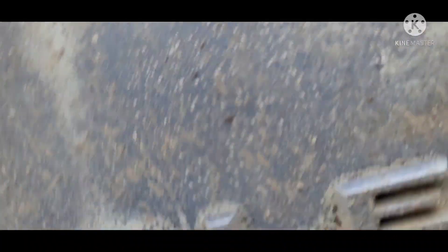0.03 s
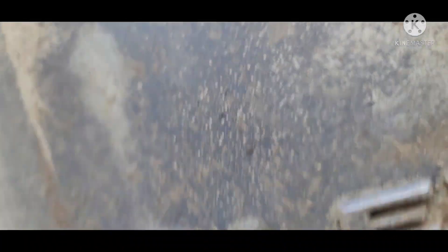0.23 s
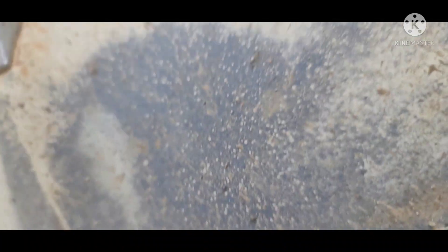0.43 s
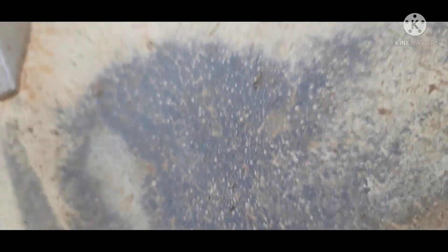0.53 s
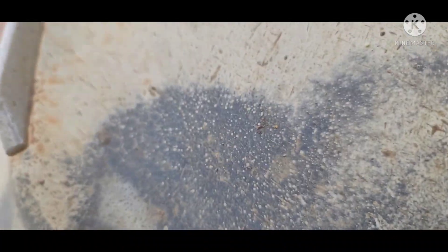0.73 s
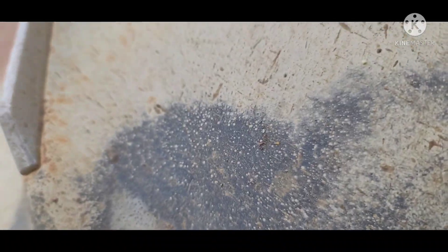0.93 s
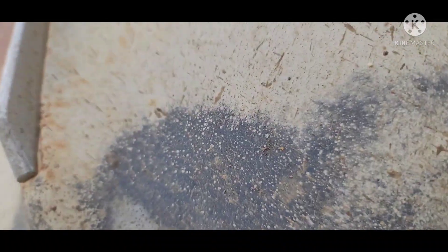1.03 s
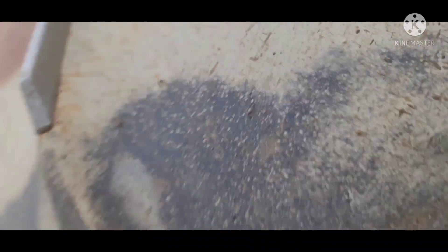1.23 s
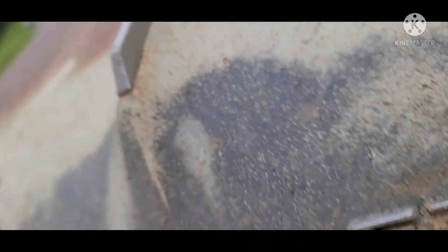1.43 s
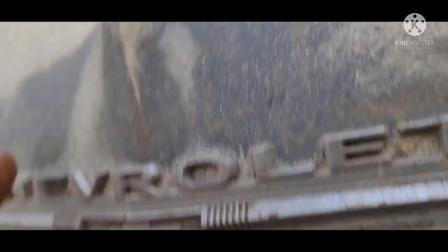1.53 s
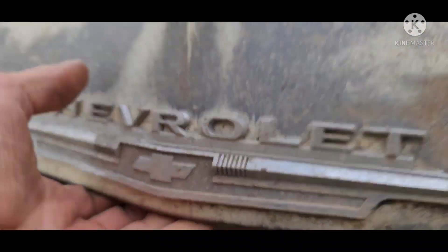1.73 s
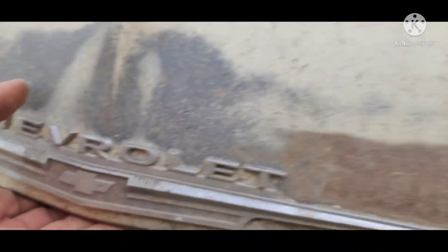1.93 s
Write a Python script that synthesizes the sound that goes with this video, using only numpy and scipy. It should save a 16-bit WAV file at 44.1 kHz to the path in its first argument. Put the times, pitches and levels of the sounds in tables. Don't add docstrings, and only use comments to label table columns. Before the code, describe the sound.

An old car hood pops open, heard close in stereo outdoors. From 0.1 to 0.25 s the latch squeals near 940 Hz amid rapid knocks; the panel booms low and wobbles until about 0.5 s. One clank lands at 0.83 s. Soft scraping comes near 1.1 s, a small squeak at 1.2, then sharp clattering from 1.23 to 1.56 s, fading into faint ticks. Faint bird whistles, quiet air.

```python
import sys
import numpy as np
from scipy import signal
from scipy.fft import rfft, irfft
from scipy.io import wavfile
from scipy.ndimage import uniform_filter1d

SR = 44100
rng = np.random.default_rng(int(sys.argv[2]) if len(sys.argv) > 2 else 0)


def ratio(d):
    e = np.asarray(d, float) / 20
    return 10 ** e


def master_out(mix):
    frames = np.transpose(np.atleast_2d(mix))
    ceiling = np.clip(frames, -1, 1)
    pcm = np.round(ceiling * 32767).astype(np.int16)
    wavfile.write(sys.argv[1], SR, pcm)


N = 88200
TIME = np.arange(N) / SR

# start in seconds, bare-metal tick in dB, sheet clang in dB,
# chatter length in seconds, top treble of the tick in dB.
KNOCKS = [(.066, -80, -57, 0.011, -14), (.088, -73, -50, 0.0039, -12), (.140, -35.5, -43, 0.018, -8),
          (.160, -55, -28.5, 0.015, -12), (.197, -49, -34.5, 0.011, -6), (.2225, -27, -30.5, 0.005, 1),
          (.232, -35, -31, 0.0089, -10), (.253, -49, -42, 0.0015, 1), (.283, -52, -44, 0.0021, 4),
          (.3587, -39, -38, 0.0034, 2.5), (.376, -52, -40, 0.0022, 3), (.419, -60, -44.5, 0.0036, 8),
          (.432, -54.5, -63, 0.0024, 8.5), (.49, -72, -46.5, 0.003, -20), (.572, -64, -54, 0.0094, -7),
          (.835, -31, -24, 0.003, 0), (1.177, -61, -54, 0.011, 9), (1.232, -47, -42, 0.035, -2),
          (1.2645, -27.5, -32.5, 0.013, -14), (1.281, -50, -35.5, 0.0033, -17), (1.302, -37, -39, .009, 5),
          (1.3095, -24, -45, 0.0059, 11), (1.3122, -21, -47, 0.0018, -6), (1.3185, -26, -36, .005, -17),
          (1.3585, -30, -33.5, 0.0061, 7), (1.363, -47, -32, 0.0027, -4), (1.3915, -27.5, -28, 0.0032, 9),
          (1.397, -24.5, -34, 0.002, 4.5), (1.411, -47, -36, 0.0048, -12),
          (1.462, -32.5, -34.5, 0.0085, 0.5), (1.5262, -46.5, -60, 0.0059, 9),
          (1.5307, -38, -39.5, 0.0062, 3), (1.561, -34, -42, 0.0071, 3), (1.705, -50, -56, 0.0073, 4),
          (1.75, -59, -72, 0.01, 9), (1.786, -52.5, -48.5, 0.0061, 8.5)]
# frequency in Hz, density in dB per Hz.
TICK_SPECTRUM = [(1180, -9.5), (2000, 2.5), (2300, -0.5), (5580, -2.5), (7640, 3), (9250, -8.5),
                 (13600, -4), (15600, -3), (16000, 4)]
# frequency in Hz, width in Hz, level in dB.
LATCH_MODES = [(2515, 60, 3.5), (3086, 26, 13.5), (3550, 53, -18), (4400, 50, -2), (6400, 25, -10.5),
               (7380, 24, -2.5), (10820, 28, -7.5), (13700, 370, 10)]
# frequency in Hz, density in dB per Hz.
SHEET_SPECTRUM = [(150, -8.5), (400, -1.5), (700, -3.5), (1300, 1), (2000, -6), (3000, -6.5), (8000, -19),
                  (14000, -45)]
# frequency in Hz, time to fall 60 dB in seconds.
SHEET_DECAY = [(300, 0.39), (700, 0.52), (1500, 0.43), (3000, 0.22), (6000, 0.14), (12000, 0.13)]
# frequency in Hz, time to fall 60 dB in seconds,
# level in dB struck at the edge, level in dB struck at the catch.
SHEET_RINGS = [(119.4, 0.25, -13, -2), (136.2, 0.45, 8, -12), (307, 0.48, 0, -6), (509.5, 0.17, -18, -1),
               (639, 0.25, -30, 1.5), (726, 0.11, 14.5, -8.5), (836, 0.12, 11.5, 4.5),
               (1116, 0.18, 3, -4.5), (1267, 0.13, 15, -6), (1385, 0.054, 20, 3), (1884, 0.079, 12.5, 2),
               (1914, 0.11, 12.5, -17), (2170, 0.027, -1, -4.5), (2970, 0.083, 2.5, -24)]
# time in seconds, level in dB.
SHAKE = [(0, -44), (0.049, -63), (0.093, -37.5), (0.146, -40), (0.166, -15), (.27, -16), (.44, -23.5),
         (.545, -28), (.575, -30.5), (0.823, -42), (.84, -30.5), (1.2, -43.5), (1.34, -30), (1.383, -22.5),
         (1.448, -29), (1.628, -30.5), (1.67, -33.5), (2.0, -44)]
# frequency in Hz, width in Hz, level in dB.
HOOD_MODES = [(48.4, 18, -5), (77.9, 12.2, -1.5), (115.9, 10.5, 0.5), (152, 26, -7), (173.6, 7.3, -6),
              (210.8, 17.4, -4.5), (279.9, 13.3, -5), (380.6, 21.3, -6), (417, 6.5, -12.5),
              (477.6, 11, -12), (539, 19, -13.5), (724, 4.9, -12)]
# frequency in Hz, density in dB per Hz.
HOOD_WASH = [(15, -47), (25, -36.5), (113, -9), (188, -25), (582, -15.5), (636, -17.5), (5000, -54),
             (6500, -72), (11000, -120)]
# start in seconds, length in seconds, pitch in Hz, level in dB.
FLEXES = [(.16, 0.033, 72, -18), (.19, 0.035, 110.6, -16.5), (.222, 0.056, 107.4, -20.5),
          (.26, 0.035, 114, -19.5), (.305, 0.047, 111.5, -17), (.40, 0.06, 123.5, -22),
          (.49, 0.035, 122, -29.5), (.525, .035, 115.5, -29.5), (.158, 0.02, 523, -23),
          (.84, 0.069, 139.7, -31.5), (1.362, .04, 113, -22.5), (1.4, .04, 115, -41),
          (1.595, 0.035, 109, -31)]
# time in seconds, pitch in Hz, level in dB,
# sharpness of the slip in dB.
SQUEAL = [
    (0.089, 1003, -63, -8),
    (0.108, 961, -31.5, -8.5),
    (0.126, 984, -25, -7),
    (0.145, 940.5, -18, -1),
    (0.159, 941.4, -16.5, -8),
    (0.177, 939, -29.5, 0.5),
    (0.192, 902, -38, 3),
    (0.201, 927, -20, -14),
    (.215, 946, -29.5, -7),
    (0.238, 922, -52, -14),
]
SQUEAL_OVERTONES = [0, -5, -17, -20]
SQUEAL_LEFT_LEAD = [1.8, 2.4, 2.2, 2.2]
# start in seconds, length in seconds, pitch in Hz, level in dB.
SQUEAKS = [
    (.118, .04, 790, -36),
    (.08, .025, 1080, -50),
    (1.208, .048, 2020, -34),
    (1.397, .04, 1850, -31),
]
# start in seconds, length in seconds, level in dB, dullness in dB.
SCRAPES = [(0.071, 0.22, -63.5, -1), (0.127, 0.098, -47, 11), (0.246, 0.16, -59.5, 11),
           (0.537, 0.097, -68, -7), (0.691, 0.066, -59.5, -13), (1.073, 0.095, -48, 8),
           (1.088, 0.054, -39.5, 6), (1.12, 0.32, -62, 14), (1.416, 0.22, -51, 9.5),
           (1.603, 0.27, -59.5, 4), (1.936, 0.099, -64.5, -17)]
# frequency in Hz, density in dB per Hz.
SCRAPE_SPECTRUM = [(240, -80), (400, -21.5), (598, -4), (1820, -11.5), (3310, -11.5), (12900, -6),
                   (16000, -5.5)]
# frequency in Hz, width in Hz, level in dB.
BRACKET = [(3980, 210, 7.5), (7240, 2000, -3), (13400, 300, -5.5)]
# start in seconds, length in seconds, first pitch in Hz, last pitch in Hz,
# level in dB.
BIRD = [
    (0, .085, 2280, 2300, -67),
    (0.597, .07, 2300, 2316, -60),
    (0.77, .045, 4700, 3820, -74),
    (0.994, .07, 2300, 2270, -56.5),
]
# frequency in Hz, density in dB per Hz.
YARD = [(30, -26), (170, -5.5), (600, -32), (2000, -31.5), (9000, -44), (16000, -43)]
# frequency in Hz, likeness from 0 to 1.
LIKENESS = [(60, .9), (200, .9), (280, .65), (450, .3), (800, .55), (1500, .65), (2600, .25)]
# frequency in Hz, left minus right in dB.
LEFT_OVER_RIGHT = [(60, -1.5), (250, 0), (500, -6.5), (950, -2), (2000, -3), (6000, 2), (14000, -4.5)]
# frequency in Hz, lead of the left in radians.
LEFT_LEAD = [(250, 0), (420, -2.4), (650, -3.0), (1300, -3.7), (2000, -4.1), (5000, -7.5), (16000, -24.5)]

EDGE_KNOCK_S, SAME_KNOCK_S = 0.835, 0.007
RISE_S = 0.0015


def evened(x):
    return x / np.sqrt(np.mean(x ** 2, -1, keepdims=True) + 1e-20)


def read(points, hz):
    f, value = np.transpose(points)
    return np.interp(np.log(hz + 1), np.log(f + 1), value)


def colour(x, points):
    log_gain = read(points, abs(np.fft.fftfreq(8192, 1 / SR))) * np.log(10) / 20
    taps = np.fft.ifft(np.exp(np.conj(signal.hilbert(log_gain)))).real[:4096]
    taps = taps / np.linalg.norm(taps)
    return signal.oaconvolve(x, taps[None], axes=1)[:, :x.shape[1]]


def resonate(x, hz, width):
    r = np.exp(-np.pi * width / SR)
    return 2 * signal.lfilter([1 - r], [1, -r * np.exp(2j * np.pi * hz / SR)], x).real


def slow(width):
    return evened(uniform_filter1d(uniform_filter1d(rng.standard_normal(N), width), width))


def hump(start, length):
    return np.sin(np.pi * np.clip((TIME - start) / length, 0, 1)) ** 2


def clumpy(x):
    z = signal.stft(x, nperseg=256)[2]
    patches = uniform_filter1d(rng.standard_normal(z.shape[1:]), size=8, axis=0)
    patches = uniform_filter1d(patches, size=4, axis=1)
    return signal.istft(z * ratio(2.5 * patches / patches.std()), nperseg=256)[1][:, :N]


def sheet_response(place):
    length = SR // 2
    t = np.arange(length) / SR
    hz, frame_s, z = signal.stft(rng.standard_normal((2, length)), SR, nperseg=256)
    decay = ratio(-60 * frame_s / read(SHEET_DECAY, hz)[:, None])
    dense = colour(signal.istft(z * decay, SR, nperseg=256)[1][:, :length], SHEET_SPECTRUM)
    rings = 0
    for f, t60, *db in SHEET_RINGS:
        envelope = ratio(db[place] - 60 * t / t60) * np.minimum(t * f / 1.64, 1)
        pitch = f * (1 + place * 0.05 * rng.standard_normal())
        phase = rng.random() + 0.13 * rng.random((2, 1))
        rings = rings + envelope * np.sin(2 * np.pi * (pitch * t + phase))

    def head_evened(v):
        return v / np.sqrt(np.mean(v[:, :600] ** 2))

    ring_gain = ratio(2 + 4 * (1 - place))
    return (head_evened(dense) + ring_gain * head_evened(rings)) * np.minimum(t / RISE_S, 1)


def latch_ring(ticks):
    tilt = 0.5 + 0.5 * np.tanh(slow(1000))
    out = 0
    for hz, width, db in LATCH_MODES:
        other_hz = hz * (1 + 0.012 * rng.standard_normal())
        ring = resonate(ticks * tilt, hz, width) + resonate(ticks * (1 - tilt), other_hz, width)
        out = out + ratio(db) * ring * np.sqrt(SR / width / 20) * ratio(slow(1500))
    return ratio(-16.5) * out


def knocks():
    grit = rng.standard_normal((2, N)) * ratio(2.5 * slow(25))
    tick_power, top_power = np.zeros(N), np.zeros(N)
    force = np.zeros((6, N))
    for k, (s, tick_db, clang_db, length, top_db) in enumerate(KNOCKS):
        on_catch = abs(s - EDGE_KNOCK_S) > SAME_KNOCK_S
        start = s - RISE_S / 2
        u = np.maximum(TIME - start, 0)
        rise = np.minimum(u / (RISE_S + 0.4 * length * on_catch), 1)
        hold = rise * ratio(-60 * np.maximum(u - length, 0) / 0.026 - 2 * u / length)
        tail = rise * ratio(-6 - 60 * u / 0.12)
        power = (ratio(tick_db) * (hold + tail)) ** 2
        tick_power += power
        top_power += power * ratio(2 * top_db)
        blow = np.arange(N) == round(start * SR)
        bounce = grit[0] * hold / np.linalg.norm(hold)
        spot = (1 + k % 5) * on_catch
        force[spot] += ratio(clang_db) * (ratio(-1) * blow + ratio(-11) * bounce)
    clang = 0
    for spot, push in enumerate(force):
        clang = clang + signal.fftconvolve(push[None], sheet_response(min(spot, 1)), axes=1)[:, :N]
    grit = clumpy(grit)
    low = signal.sosfiltfilt(signal.butter(3, 9500, fs=SR, output="sos"), grit)
    ticks = np.sqrt(tick_power) * low + np.sqrt(top_power) * (grit - low)
    return colour(ticks, TICK_SPECTRUM) + latch_ring(ticks) + clang


def hood():
    drive = rng.standard_normal((2, N))
    modes = 0
    for k, (hz, width, db) in enumerate(HOOD_MODES):
        modes = modes + (-1) ** k * ratio(db) * resonate(drive, hz, width) / np.sqrt(width)
    wash = colour(rng.standard_normal((2, N)) * ratio(2 * slow(300)), HOOD_WASH)
    s, db = np.transpose(SHAKE)
    return ratio(np.interp(TIME, s, db) - 6) * (evened(modes) + ratio(-4.5) * wash)


def flexes():
    out = np.zeros(N)
    for s, length, hz, db in FLEXES:
        out += ratio(db) * hump(s, length) ** 0.92 * np.sin(2 * np.pi * hz * (TIME - s))
    return out


def squeal():
    s, hz, db, sharp_db = np.transpose(SQUEAL)
    turns = np.cumsum(np.interp(TIME, s, hz) * (1 + 0.005 * slow(120))) / SR
    release_db = 60 * np.clip((TIME - s[-1]) / 0.005 + 1, 0, 2)
    level = np.interp(TIME, s, db, left=-120) - release_db
    sharpness = np.interp(TIME, s, sharp_db)
    side = np.array([[0.5], [-0.5]])
    out = 0
    for k, (over_db, lead) in enumerate(zip(SQUEAL_OVERTONES, SQUEAL_LEFT_LEAD)):
        fuzz = 1 + (k + 1) * ratio(-21) * np.array([slow(60), slow(60)])
        gain = ratio(level + over_db + np.sqrt(k) * (sharpness + 1.5 * slow(200)))
        tone = np.sin(2 * np.pi * (k + 1) * turns + side * lead)
        out = out + 2 * gain * fuzz * ratio(-2.5 * side) * tone
    return out


def squeaks():
    out = np.zeros(N)
    for s, length, hz, db in SQUEAKS:
        out += ratio(db) * hump(s, length) * (1 + 0.34 * slow(60)) * np.sin(2 * np.pi * hz * TIME)
    return out


def scrapes():
    bright, dull = np.zeros(N), np.zeros(N)
    for s, length, db, dull_db in SCRAPES:
        fade_in = (TIME - s) / (0.007 + 0.068 * length)
        fade_out = (s + length - TIME) / (0.007 + 0.16 * length)
        stroke = ratio(db) * np.clip(np.minimum(fade_in, fade_out), 0, 1)
        bright += stroke
        dull += stroke * ratio(dull_db)
    clicks = rng.random((2, N)) < 9000 / SR
    grit = evened(clicks * rng.standard_normal((2, N)) * ratio(1.5 * slow(120)))
    rub = colour(evened(clumpy(grit)), SCRAPE_SPECTRUM)
    rub = rub + sum(ratio(db) * resonate(rub, hz, width) for hz, width, db in BRACKET)
    low = signal.sosfilt(signal.butter(2, 5500, fs=SR, output="sos"), rub)
    return bright * (rub - low) + dull * low


def bird():
    out = np.zeros(N)
    for s, length, from_hz, to_hz, db in BIRD:
        u = TIME - s
        turns = from_hz * u + (to_hz - from_hz) * u ** 2 / (2 * length)
        out += ratio(db) * hump(s, length) * np.sin(2 * np.pi * turns)
    return out


def yard():
    return ratio(-56.5) * colour(evened(clumpy(rng.standard_normal((2, N)))), YARD)


def scene():
    paths = knocks() + hood() + flexes() + squeaks() + scrapes() + bird() + yard()
    a, b = rfft(paths, 2 * N)
    hz = np.fft.rfftfreq(2 * N, 1 / SR)
    same = np.clip(read(LIKENESS, hz), 0, 1)
    half = ratio(read(LEFT_OVER_RIGHT, hz) / 2) * np.exp(0.5j * read(LEFT_LEAD, hz))
    left = a * half
    right = (same * a + np.sqrt(1 - same ** 2) * b) / half
    return irfft([left, right])[:, :N] + squeal()


def band_limit(x):
    return signal.sosfilt(signal.butter(12, 16450, fs=SR, output="sos"), x)


def record(dry):
    x = dry - 0.37 * resonate(dry, 9800, 640)
    low_pass = signal.firwin(301, 15600, window=("kaiser", 7), fs=SR)
    x = signal.oaconvolve(x, low_pass[None], "same")
    return band_limit(x)


dry = scene()
out = record(dry)
master_out(out)
```